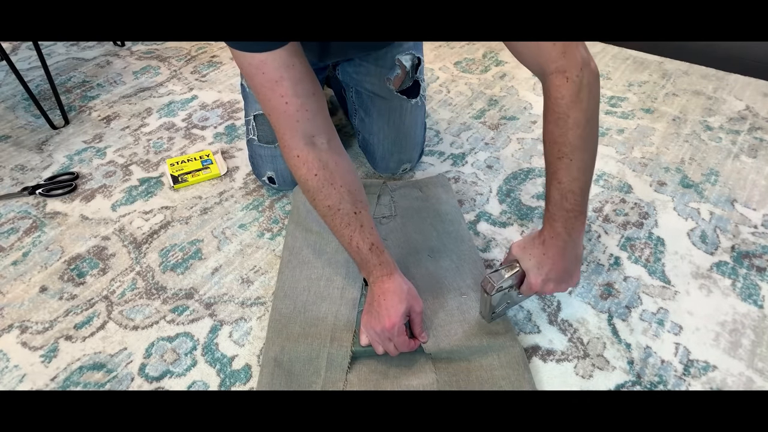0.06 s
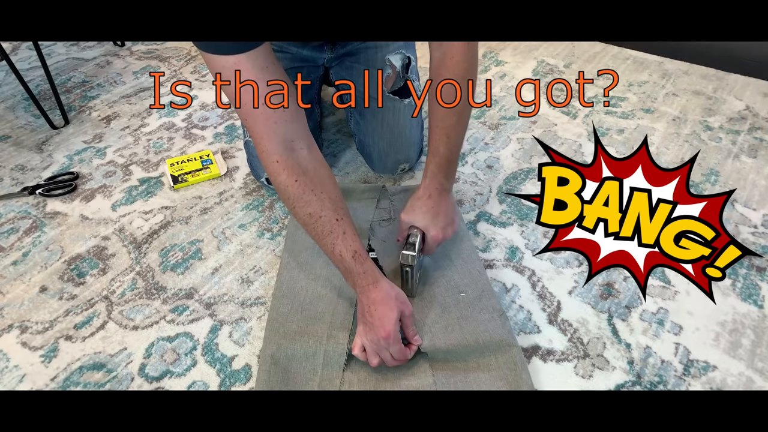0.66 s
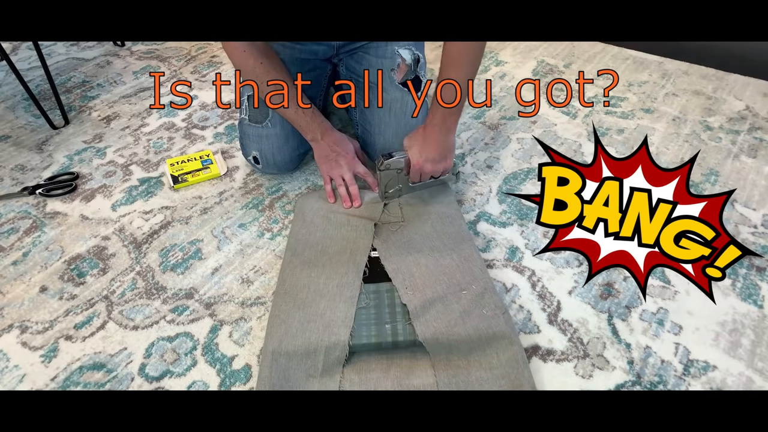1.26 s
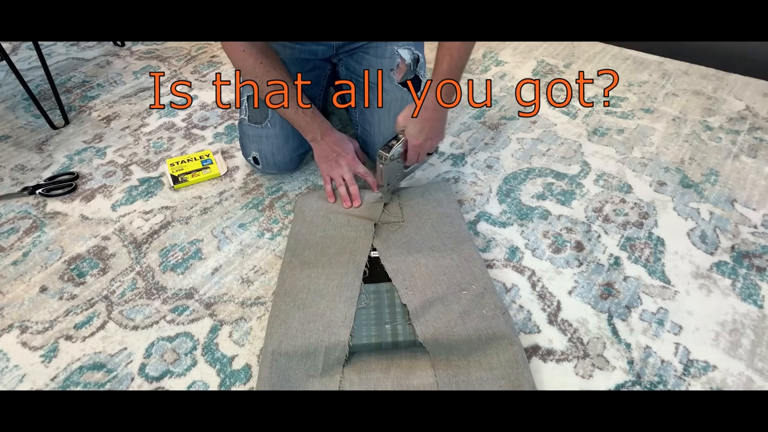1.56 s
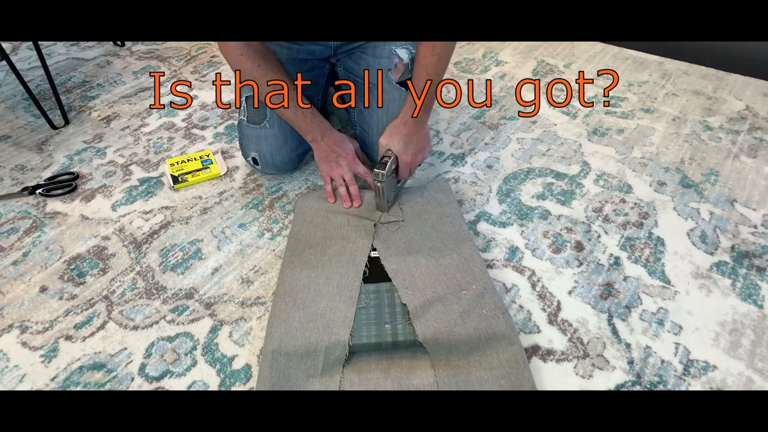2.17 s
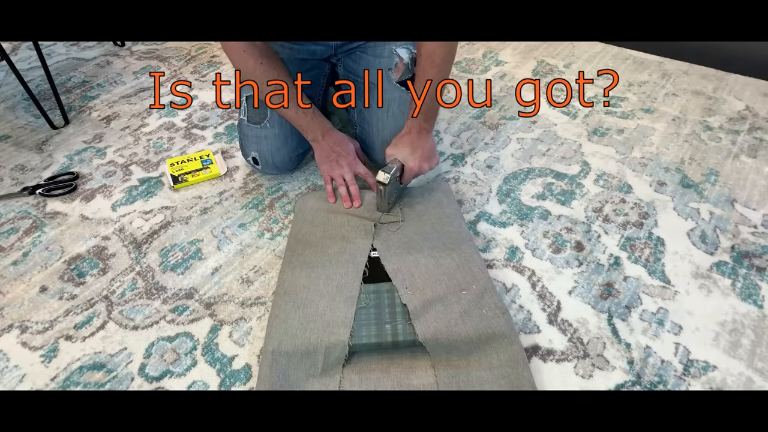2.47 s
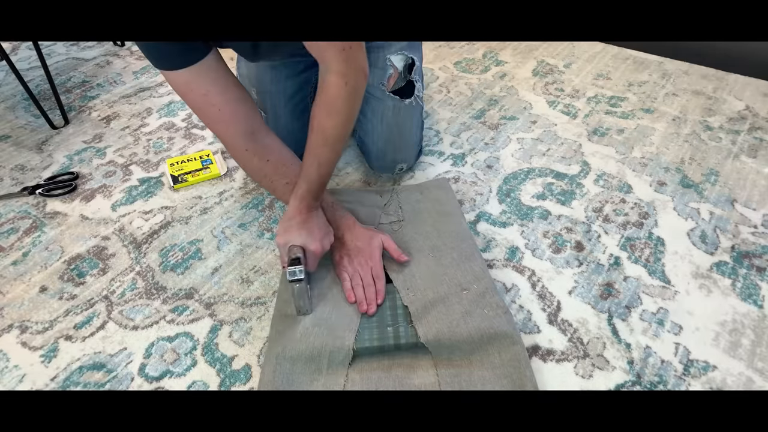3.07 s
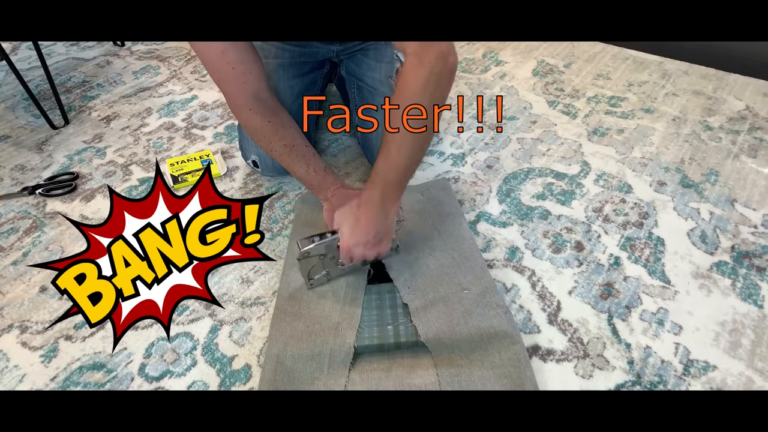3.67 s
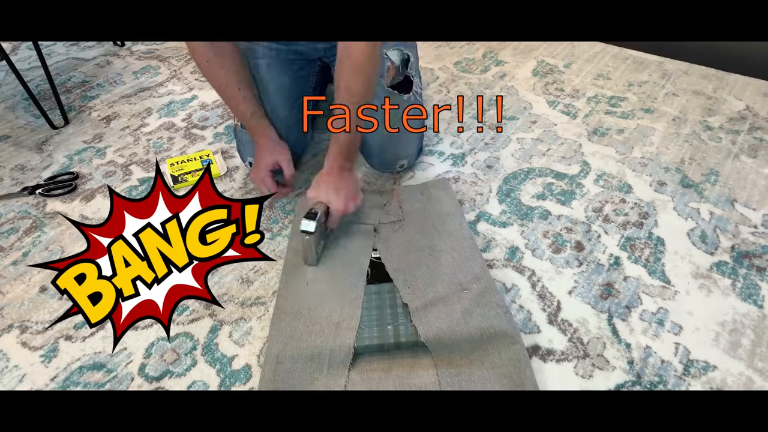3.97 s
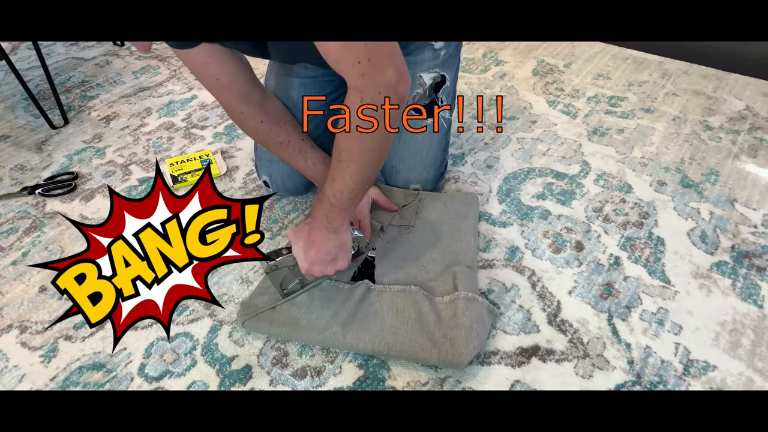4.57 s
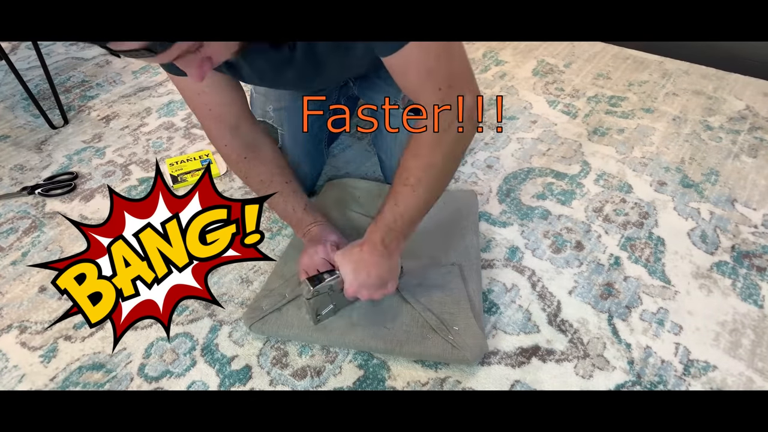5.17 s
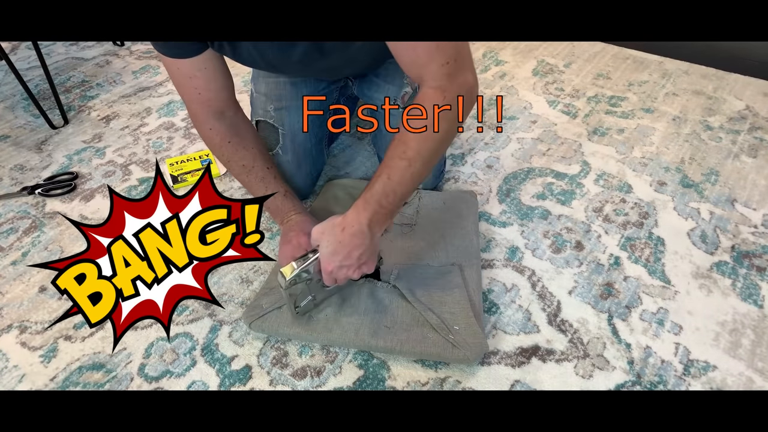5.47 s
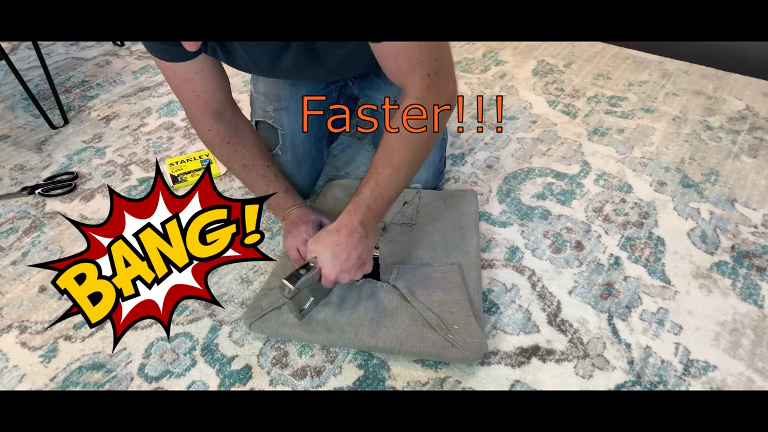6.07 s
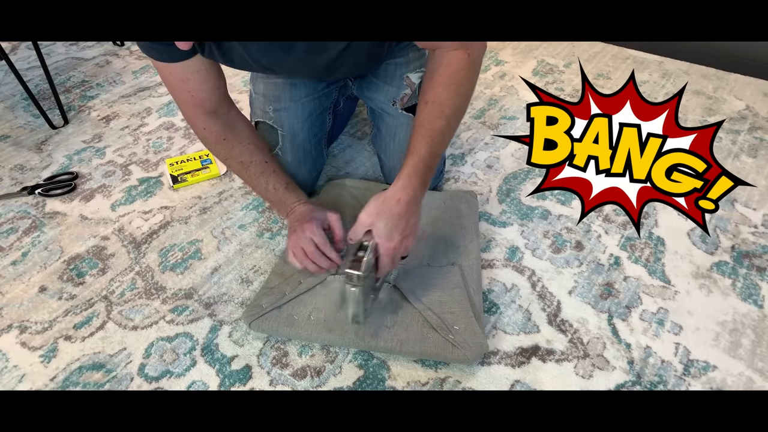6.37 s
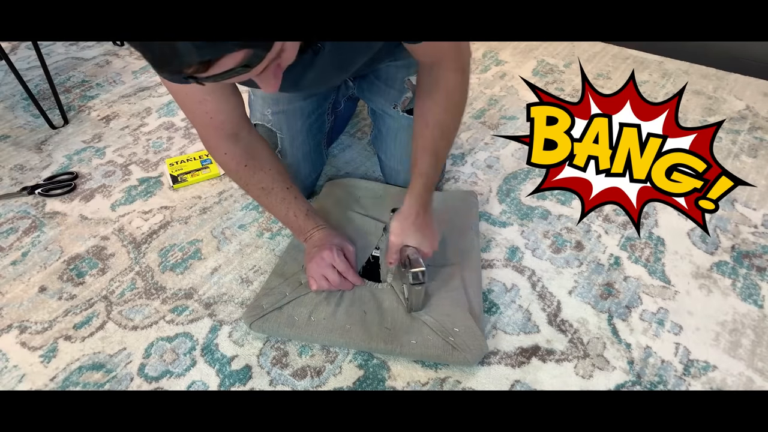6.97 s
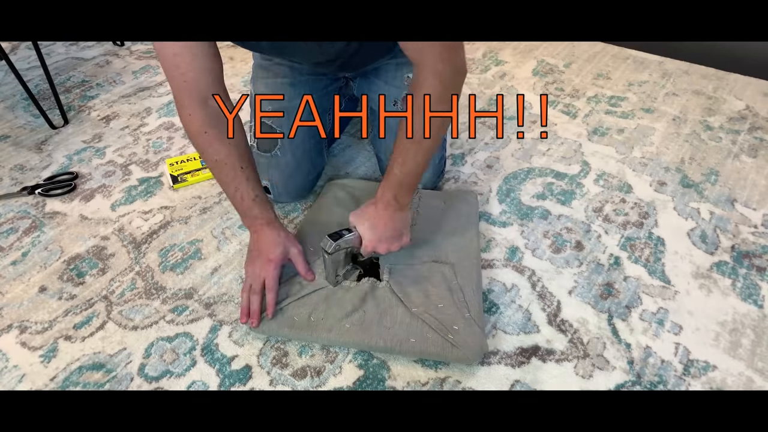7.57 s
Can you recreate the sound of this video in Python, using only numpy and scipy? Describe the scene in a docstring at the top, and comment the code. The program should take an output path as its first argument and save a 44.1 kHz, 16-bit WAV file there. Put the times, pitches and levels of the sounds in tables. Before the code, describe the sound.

A hand staple gun drives staples through fabric into a wooden chair seat in a small, lively room. Each shot is a sharp steel snap with a wooden knock and a brief ring, loud enough to overload the microphone. The shots start unevenly spaced, with small metal clicks between them, then speed into a quick run. After a lull broken by one shot, a second rapid run follows. Most snaps cut off abruptly.

```python
"""A hand staple gun drives staples through fabric into a wooden chair seat, on carpet in a small live room.
Each squeeze trips the latch; about 20 ms later the spring slams the steel driver down, the seat knocks
and the room rings. Between shots the gun gives small steel clicks and the seat bumps on the carpet.
The snaps overload the microphone. Spliced tight, they bunch into two quick runs; most tails stop dead."""
import sys
import numpy as np
from scipy import signal
from scipy.fft import rfft, irfft
from scipy.io import wavfile
from scipy.ndimage import map_coordinates

SR = 44100
rng = np.random.default_rng(int(sys.argv[2]) if len(sys.argv) > 2 else 0)


def to_wav(s):
    """Save 16-bit WAV."""
    ch = np.atleast_2d(s).T  # columns
    pcm = np.round(np.clip(ch, -1, 1) * 32767)  # PCM
    wavfile.write(sys.argv[1], SR, pcm.astype(np.int16))


N = 344418
T = np.arange(SR * 3 // 4) / SR  # time axis of one hit [s]
HZ = np.fft.rfftfreq(len(T), 1 / SR)  # frequency axis of one hit

# staple cues: (time [s], latch lead [s], length up to the splice [s], thump gain [dB], knock gain [dB],
# knock pitch [Hz], steel pitch [Hz])
SHOTS = [(0.1871, 0.019, .328, -2, -3.5, 386, 5540), (0.7495, 0.02, .212, 7.5, 3, 872, 4940),
         (1.0865, .019, .75, 1, 3, 554, 4870), (2.3581, .020, .261, 9, 5, 850, 2300),
         (2.6745, 0.017, 0.51, -1, 7.5, 774, 2273), (2.9902, 0.017, .185, -6, 2.5, 937, 2870),
         (3.2551, 0.027, .18, -1, 2.5, 352, 1837), (3.512, .021, 0.3, -4.5, 4, 744, 1856),
         (3.8647, 0.019, .229, -7, 1.5, 434, 3044), (4.1228, .015, .029, -3, 2.5, 399, 2090),
         (4.168, .013, 0.041, 2, 3, 853, 4231), (4.226, 0.014, 0.076, -4, 3.5, 495, 4260),
         (4.3356, 0.028, 0.023, 4, -6, 515, 2470), (4.3867, 0.009, 0.075, -6, -2, 894, 2560),
         (4.4825, 0.018, 0.08, -15, -4, 503, 5720), (4.6076, 0.016, 0.086, 2, 2.5, 882, 5700),
         (4.7391, 0.014, 0.048, 1, -1, 1090, 2230), (4.8112, 0.0081, .063, 0, -2.5, 1086, 2670),
         (4.9242, 0.012, 0.1, 3.5, 3.5, 852, 2627), (5.039, 0.0098, 0.11, 6, 1, 502, 4730),
         (5.174, 0.024, .181, 3, 1, 1028, 3110), (5.9581, .015, .75, 2, -1.5, 1052, 1892),
         (6.7815, 0.02, 0.0573, 7, -0.5, 1137, 2135), (6.846, 0.016, 0.047, 6, 2, 382, 2306),
         (6.9074, 0.016, .062, 4.5, 1, 422, 5300), (6.9977, 0.025, 0.042, 3, 3.5, 839, 2886),
         (7.0982, 0.029, .037, 1, -2, 864, 4110), (7.1627, 0.024, 0.066, 0, 0.5, 884, 3190),
         (7.2814, 0.018, 0.069, -9, 1, 896, 3054), (7.3993, 0.028, 0.054, 1, 0, 847, 1990),
         (7.478, .015, 0.088, -12, 5.5, 505, 2620), (7.5997, 0.015, 0.067, -4, 3.5, 1070, 4930),
         (7.7039, 0.016, .065, -4, 5.5, 408, 2356), (7.8077, .018, .1, 18, 8.5, 833, 2070)]
# small steel clicks of the gun: the handle, and at 3.805 s a latch tick cut short by a splice:
# (time [s], level [dB], ping pitch [Hz])
GUN_CLICKS = [(0.144, -48.5, 1470), (0.421, -30, 1268), (0.472, -16, 1273), (0.604, -41, 1800),
              (1.369, -16, 2280), (1.877, -45.5, 2650), (2.179, -52.5, 2280), (2.913, -28.5, 2300),
              (3.756, -30.5, 2350), (3.805, -9.5, 2348), (5.549, -51, 1920), (5.655, -41.5, 1920),
              (5.799, -33.5, 2420), (6.221, -13.5, 2000)]
# the seat bumps on the carpet: (time [s], level [dB], pitch [Hz])
CARPET_BUMPS = [(6.378, -45.5, 49.4), (6.615, -52.5, 177)]
# modes of the wooden seat and the gun's steel parts: (frequency [Hz], level [dB], t60 [s])
SEAT_MODES = [(164, -13, 0.11), (290, -12, 0.15), (366.2, -7, 0.21), (417.2, -6, 0.33), (503, -2, .1),
              (584, 1.5, 0.062), (758, -12, 0.1), (855, 2.5, 0.087), (870, -14.5, 0.9), (1038, -2, 0.1),
              (1145, -12, 0.64)]
BODY_MODES = [(1863, -2.5, 0.11), (1954, -3.5, 0.047), (2115, -4, 0.15), (2730, -10.5, 0.052),
              (3120, -4, 0.2), (4050, -4.5, 0.097), (5400, -7, 0.056), (5830, -2.5, 0.049),
              (7070, -6.5, 0.097), (11060, -5.5, 0.13)]
SPRING_MODES = [(1503, -2.5, 0.44), (1770, -4, 0.5), (1834, 2.5, .45), (2030, -3, 0.28), (2196, -4.5, 0.4),
                (2970, 1.5, 0.38), (4800, -3, .5), (5560, -3, 0.24), (5640, -5, 0.25), (7300, -8.5, .35)]
HANDLE_MODES = [(1640, -9, 0.33), (1880, -3.5, .2), (2169, -5, .17), (4102, -6.5, .15), (5600, 0.5, .13),
                (6761, -10, 0.17), (7773, -14, 0.17), (9281, -9, .09), (11530, -9, .18)]
# noise colours of steel clash, wood knock, low thump, latch tick, reverb and room tone:
# (frequency [Hz], level [dB])
CLASH_EQ = [(200, -28), (900, -12.5), (1400, -6.5), (2300, 1.5), (3800, -2.5), (5600, 0.5), (8000, -3.5),
            (12000, -10.5), (16000, -18)]
KNOCK_EQ = [(40, -24.5), (220, -14), (370, -4.5), (550, -5.5), (930, 0), (1350, -10.5), (2200, -12.5),
            (5000, -23.5), (16000, -49)]
THUMP_EQ = [(15, -9), (35, -1.5), (80, -8), (160, -2.5), (400, -24.5), (2000, -73)]
LATCH_EQ = [(30, -11.5), (170, -16), (500, -8.5), (900, -2), (1400, -7), (2150, -2), (3200, -4.5),
            (5300, -3), (9000, -12), (16000, -21.5)]
REVERB_EQ = [(30, -19), (120, -19), (230, -6.5), (400, 2), (620, -2), (1000, 0), (1400, 0.5), (2100, 0),
             (3700, -1.5), (5200, -1.5), (7000, -2.5), (10000, -11.5), (16000, -22)]
ROOM_TONE_EQ = [(20, -6.5), (100, -8), (250, -9.5), (450, -14), (1000, -12.5), (3000, -21.5), (6000, -27.5),
                (9000, -33.5), (16000, -40)]
# decay of the room's reverb: (frequency [Hz], t60 [s])
REVERB_DECAY = [(60, 0.27), (300, 0.42), (1000, 0.49), (5000, 0.46), (9000, 0.335), (16000, 0.37)]


def amp(db):
    """Decibels to gain."""
    return 10 ** (np.asarray(db) / 20)


def curve(points, hz):
    """Read (frequency, value) points along a log frequency axis."""
    freqs, values = np.transpose(points)
    return np.interp(np.log(hz + 1), np.log(freqs + 1), values)


def noise(eq, bright_db=0, colour_db=0, size=len(T)):
    """Noise of rms 1, shaped by an EQ curve, a treble shelf and the resonances in colour_db."""
    hz = np.fft.rfftfreq(size, 1 / SR)
    shelf = hz ** 2 / (hz ** 2 + 5000 ** 2)
    gain = amp(curve(eq, hz) + bright_db * shelf + colour_db)
    shaped = irfft(rfft(rng.standard_normal(size)) * gain, size)
    return shaped / np.sqrt(np.mean(shaped ** 2) + 1e-20)


def bell(centre_hz, height_db, octaves):
    """One resonance as a bell EQ, in dB."""
    return height_db / (1 + (np.log2((HZ + 1) / centre_hz) / octaves) ** 2)


def ripple(depth_db, spacing_hz):
    """Random EQ ripple in dB: each blow excites the crowd of close modes unevenly."""
    return depth_db * map_coordinates(rng.standard_normal(SR // 16), [HZ / spacing_hz], mode='wrap')


def fade(t60):
    """Free decay, 60 dB down after t60 seconds."""
    return np.exp(-np.log(1000) * T / t60)


def burst(attack_s, t60):
    """Envelope with a rounded attack and a free decay."""
    return (1 - np.exp(-(T / attack_s) ** 2)) * fade(t60)


def delay(sound, seconds):
    """The same sound, later."""
    return np.interp(T - seconds, T, sound, left=0)


def ping(hz, t60):
    """One damped mode."""
    return np.sin(2 * np.pi * hz * T) * fade(t60)


def ring(modes, scatter_db, detune):
    """Damped modes; each blow lands elsewhere and stirs them differently."""
    hz, db, t60 = np.transpose(modes)
    strength, shift, phase = rng.standard_normal((3, len(hz)))
    pitches = hz * (1 + detune * shift)
    waves = np.sin(2 * np.pi * (pitches[:, None] * T + phase[:, None]))
    return amp(db + scatter_db * strength) @ (waves * fade(t60[:, None]))


def place(track, time, sound):
    """Lay a hit on the track; the next splice chops its tail to a faint trace in 2 ms."""
    splices = [start + length for start, _, length, *_ in SHOTS]
    cut = min((splice for splice in splices if splice > time + .004), default=np.inf)
    gate = np.clip((cut - time - T) / .002, amp(-28.5), 1)
    slot = track[round(time * SR):][:len(T)]
    slot += (sound * gate)[:len(slot)]


def room_tone():
    """A faint, dark bed of air."""
    return amp(-66.5) * noise(ROOM_TONE_EQ, size=N)


def reverb(bright_db, colour_db, echo_db):
    """The room's answer: a diffuse tail that lingers in the mids, and a ceiling slap at 26 ms."""
    hz, t, bands = signal.stft(noise(REVERB_EQ, bright_db, colour_db), SR, nperseg=256)
    decay = np.exp(-np.log(1000) * t / curve(REVERB_DECAY, hz)[:, None])
    tail = signal.istft(bands * decay, SR, nperseg=256)[1][:len(T)]
    bloom = 1 - np.exp(-(T / .016) ** 2)
    slap = amp(echo_db) * delay(burst(.0026, .039), .026)
    return tail * (bloom + slap)


def carpet_bumps():
    """The seat shifts on the carpet with soft, low bumps."""
    track = np.zeros(N)
    for time, db, hz in CARPET_BUMPS:
        place(track, time, amp(db) * np.sin(2 * np.pi * hz * T) * burst(.0048, .17))
    return track


def gun_clicks():
    """Small steel clicks of the gun between shots, each with a bright ping and a touch of room."""
    track = np.zeros(N)
    for time, db, ping_hz in GUN_CLICKS:
        colour_db = ripple(depth_db=3.2, spacing_hz=129.1) + bell(ping_hz, height_db=6, octaves=.07)
        steel = amp(-17) * ring(HANDLE_MODES, scatter_db=2, detune=.003) + amp(-9.5) * ping(ping_hz, .11)
        click = noise(CLASH_EQ, colour_db=colour_db) * burst(.00069, .051)
        tail = amp(-19) * reverb(bright_db=2, colour_db=colour_db, echo_db=-7.5)
        place(track, time, amp(db - 11) * (click + steel + tail))
    return track


def latches():
    """Just before each shot the catch slips off the loaded spring: a dry tick and a small seat knock."""
    attack_s, soft_from_s, soft_db = .0014, 4.1, -7.5  # the knock is softer from the first quick run on
    track = np.zeros(N)
    for time, lead_s, _, _, knock_db, _, steel_hz in SHOTS:
        envelope = burst(attack_s, .017) + amp(-21.5) * burst(.0055, .25)
        tick = noise(LATCH_EQ, colour_db=ripple(depth_db=3.5, spacing_hz=250)) * envelope
        steel = amp(-22) * ring(BODY_MODES, scatter_db=2, detune=.018) * fade(.05)
        steel += amp(-5.5) * ping(steel_hz, .018)
        wood = ring([(780, -1.5, .035), (905, -1.5, .035)], scatter_db=2.5, detune=.047)
        knock = amp(.6 * knock_db - 8.5 + soft_db * (time > soft_from_s)) * wood
        place(track, time - lead_s, amp(-18.5) * (tick + (steel + knock) * burst(attack_s, .87)))
    return track


def seat_knock(thump_db, knock_db, knock_hz):
    """The staple bites into the wood, and a moment later the recoil knocks the seat harder."""
    recoil_s = .006
    db_per_octave = 3.5  # modes answer less, the further from the pitch of the struck spot
    modes = [(hz, db - db_per_octave * abs(np.log2(hz / knock_hz)), t60) for hz, db, t60 in SEAT_MODES]
    wood = amp(-17) * ring(modes, scatter_db=1.5, detune=.008) + amp(-12) * ping(knock_hz, .077)
    wood = delay(wood * burst(.001, 1), recoil_s / 2)
    bite = amp(-2) * burst(.0019, .027)
    recoil = delay(burst(.0012, .06), recoil_s)
    knock = amp(-11.5) * noise(KNOCK_EQ) * (bite + recoil)
    thump = noise(THUMP_EQ) * (burst(.0018, .067) + amp(-15.5) * burst(.013, .11))
    return amp(knock_db) * (wood + knock) + amp(thump_db - 28.5) * thump


def driver_snap(bright_db, colour_db, steel_hz):
    """The driver slams onto its stop in a noisy clash and rings the gun's steel body."""
    clash = amp(1.5) * noise(CLASH_EQ, bright_db, colour_db) * burst(.003, .049)
    body = amp(-21) * ring(BODY_MODES, scatter_db=1.4, detune=.013) + amp(-12.5) * ping(steel_hz, .088)
    return clash + body * burst(.0016, .92)


def staple_shots():
    """Each shot layers snap, knock, singing spring and room. The spring always strikes equally hard."""
    track = np.zeros(N)
    for time, _, _, thump_db, knock_db, knock_hz, steel_hz in SHOTS:
        steel_db = ripple(depth_db=2.5, spacing_hz=69.99) + bell(steel_hz, height_db=2.5, octaves=.092)
        bright_db = .5 * np.log2(steel_hz / 3200)  # higher steel note, brighter snap
        snap = driver_snap(bright_db, steel_db, steel_hz)
        knock = seat_knock(thump_db, knock_db, knock_hz)
        spring = amp(-35) * ring(SPRING_MODES, scatter_db=2.5, detune=.003)
        # a harder knock leaves a woodier, slightly louder ring-out
        wood_db = bell(knock_hz, height_db=3.5, octaves=.15)
        wood_db += bell(550, height_db=.6 * knock_db, octaves=.9)
        tail = amp(-16) * reverb(bright_db, steel_db + wood_db, echo_db=-4)
        place(track, time, snap + knock + amp(.1 * knock_db) * (spring + tail))
    return track


def scene():
    """Mono mix of the gun at work over the room tone."""
    return (latches() + staple_shots() + gun_clicks() + carpet_bumps() + room_tone())[None]


def record(dry):
    """The overloaded microphone flattens each snap; a low-pass trims the very top."""
    ceiling, hardness, cutoff_hz = .53, 7, 15900
    clipped = dry / (1 + np.abs(dry / ceiling) ** hardness) ** (1 / hardness)
    lowpass = signal.firwin(129, cutoff_hz, window=('kaiser', 8), fs=SR)
    return signal.fftconvolve(clipped, lowpass[None], 'same', axes=1)


dry = scene()
out = record(dry)
to_wav(out)
```